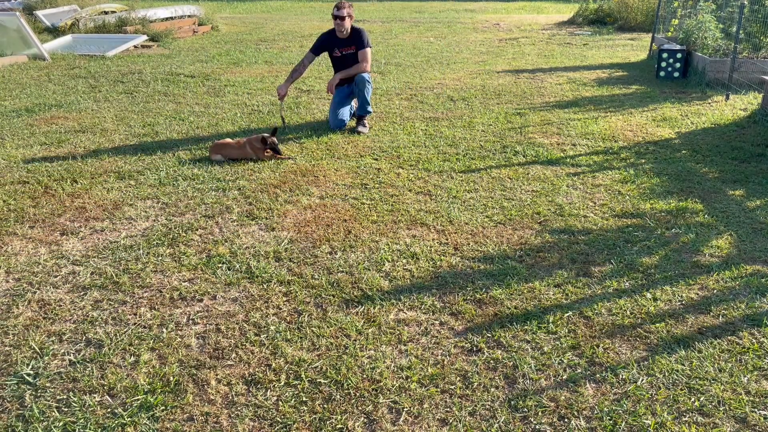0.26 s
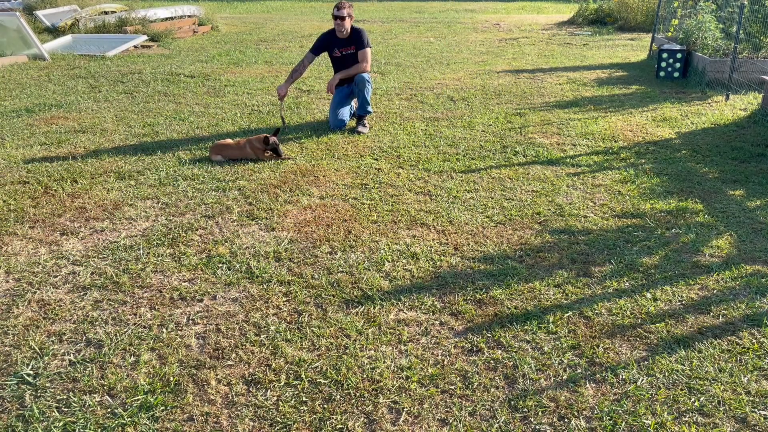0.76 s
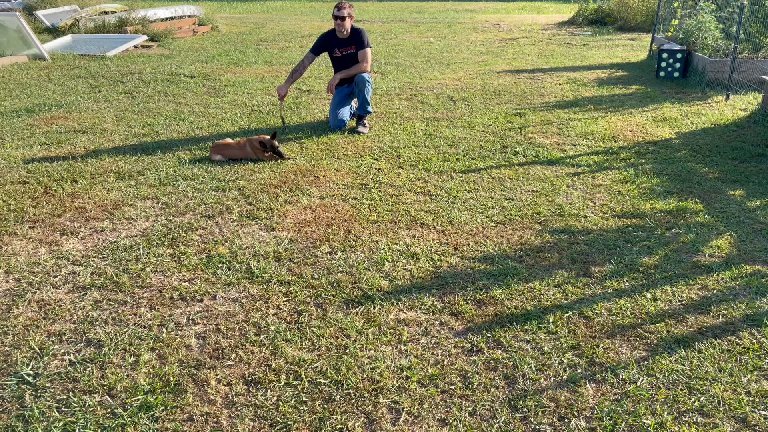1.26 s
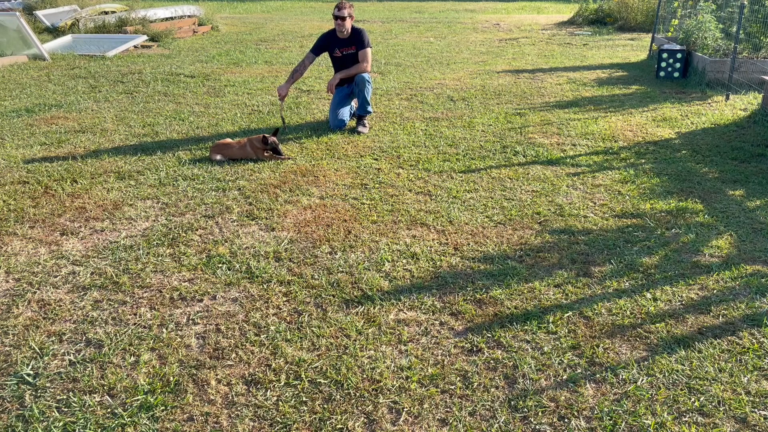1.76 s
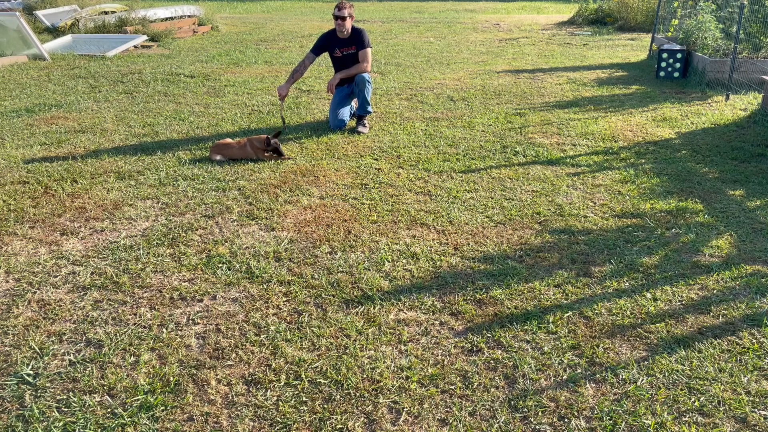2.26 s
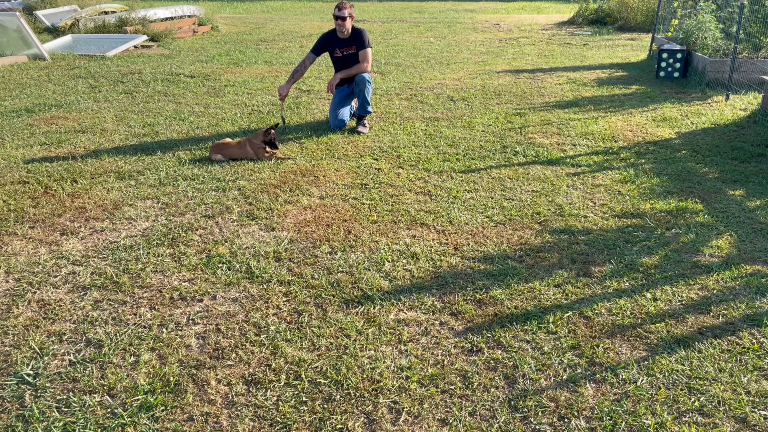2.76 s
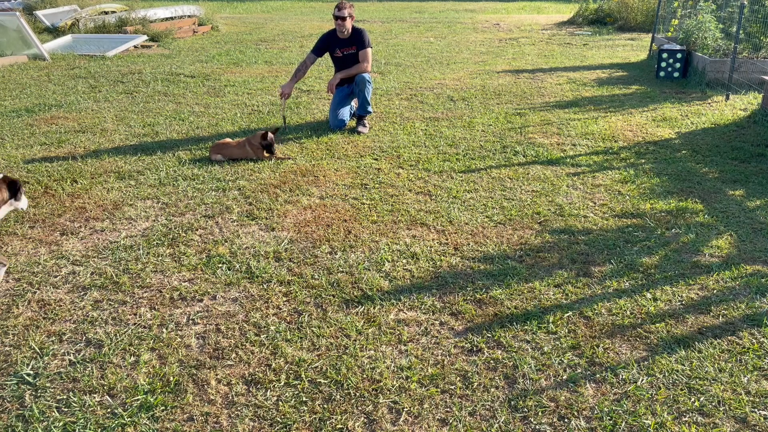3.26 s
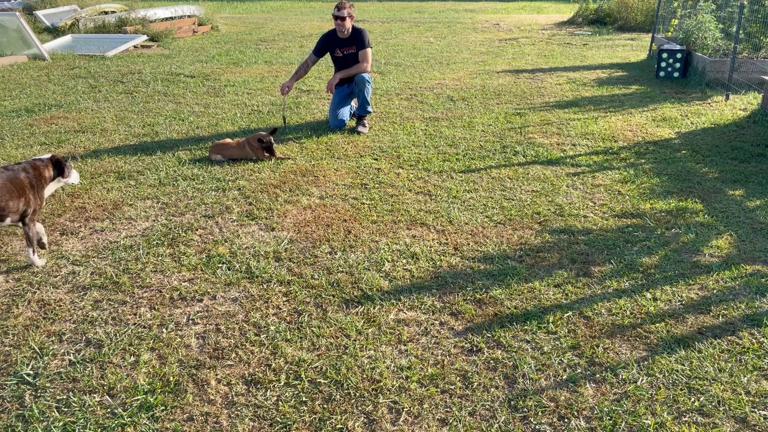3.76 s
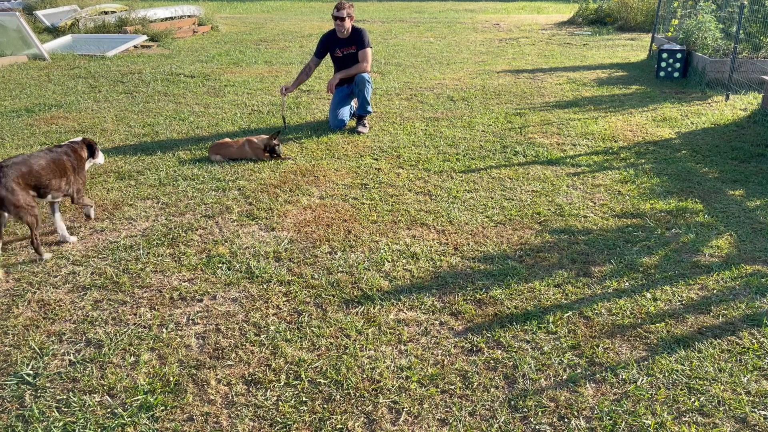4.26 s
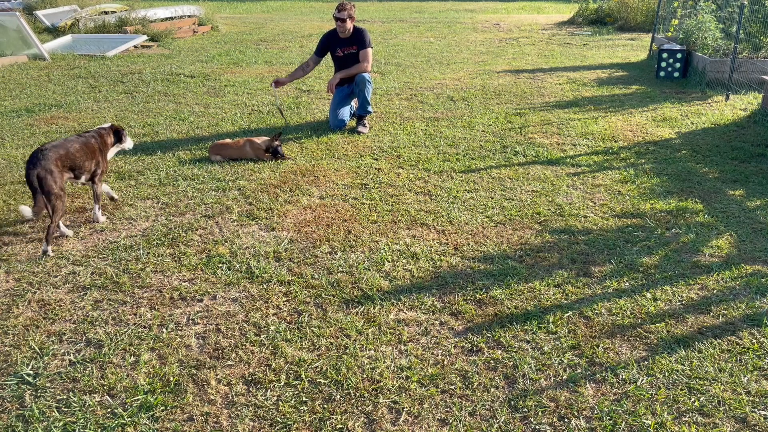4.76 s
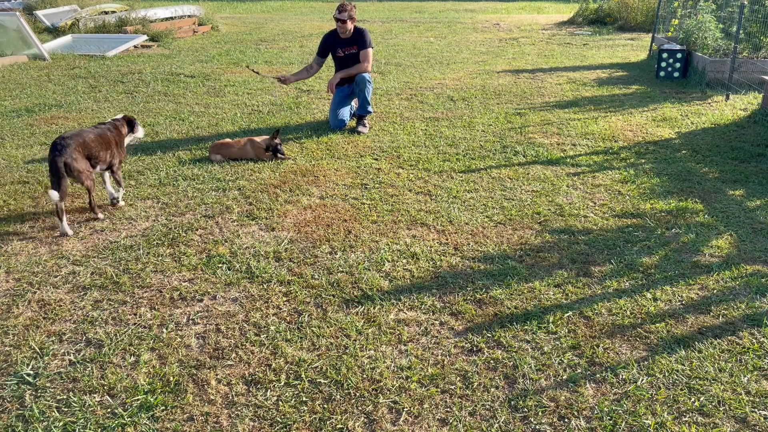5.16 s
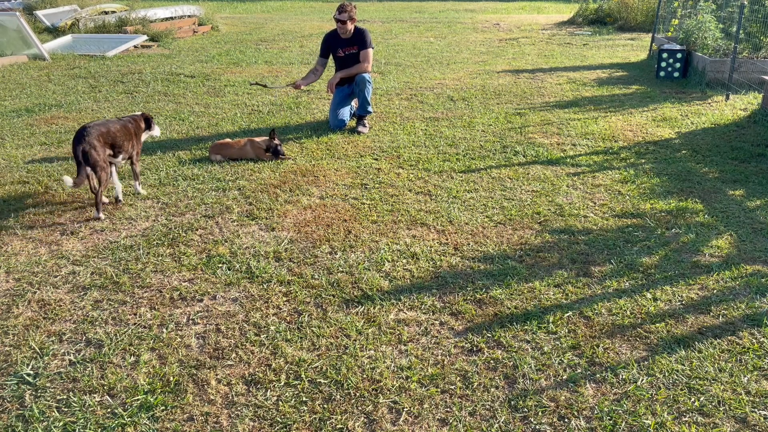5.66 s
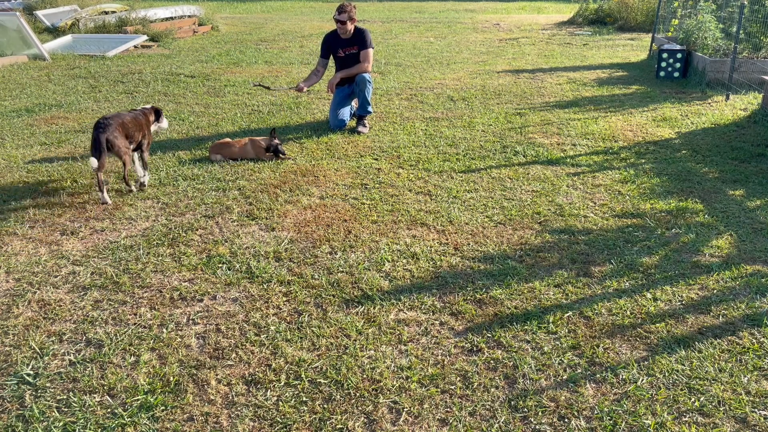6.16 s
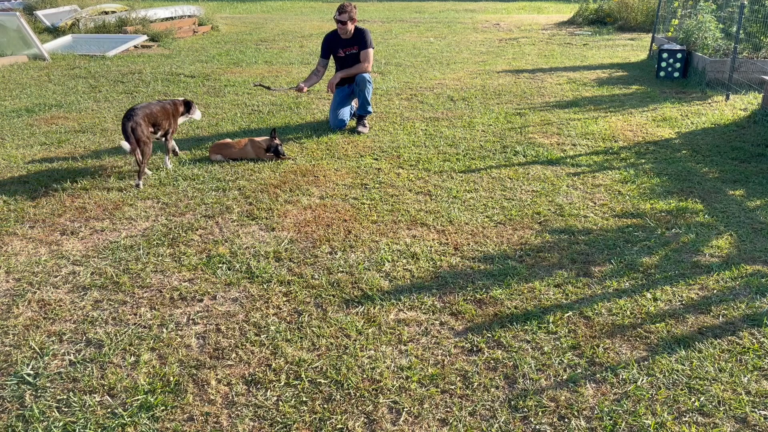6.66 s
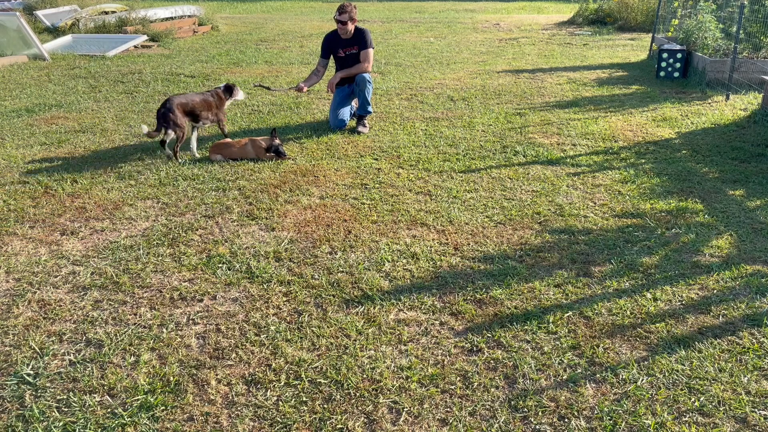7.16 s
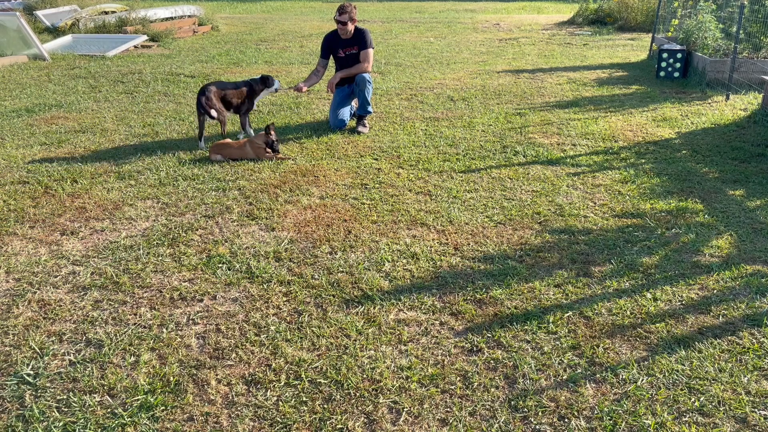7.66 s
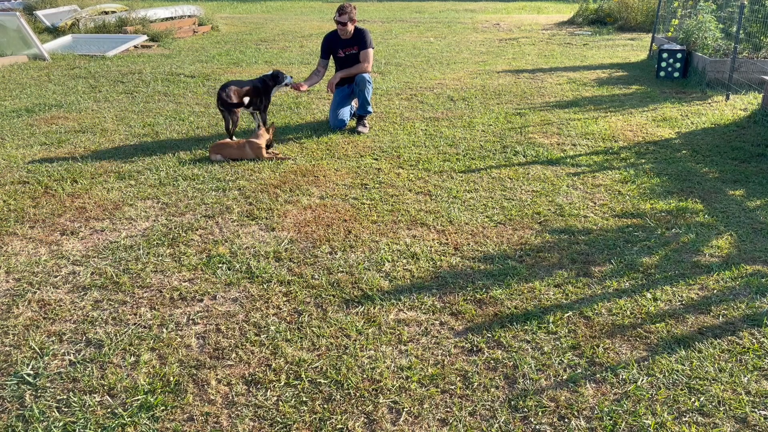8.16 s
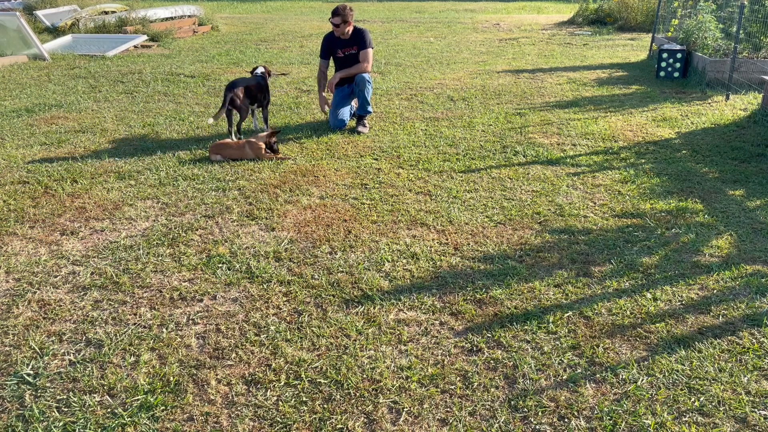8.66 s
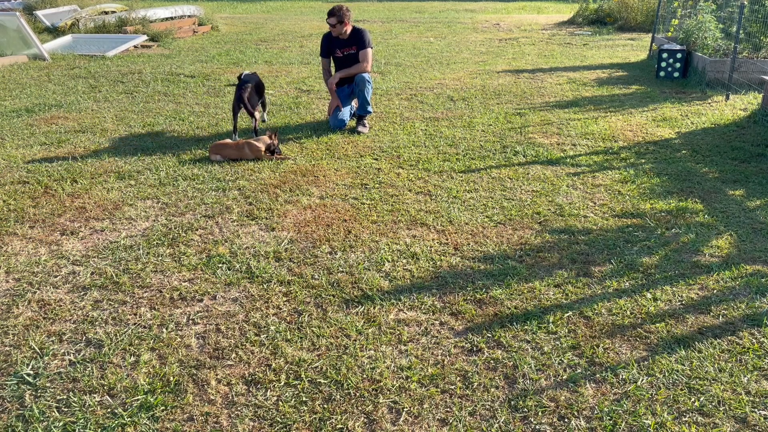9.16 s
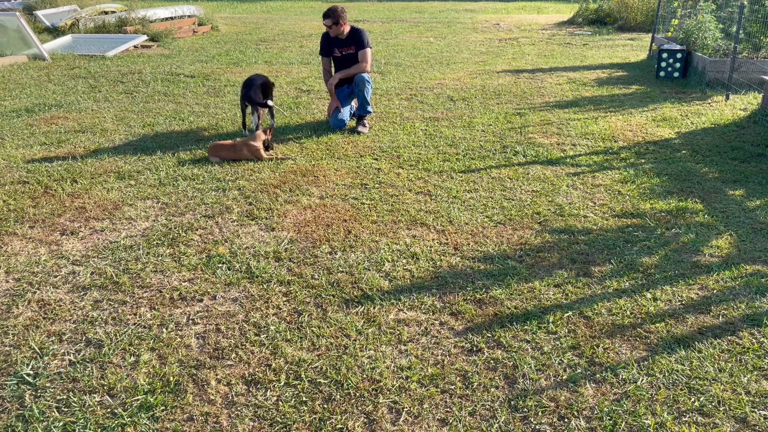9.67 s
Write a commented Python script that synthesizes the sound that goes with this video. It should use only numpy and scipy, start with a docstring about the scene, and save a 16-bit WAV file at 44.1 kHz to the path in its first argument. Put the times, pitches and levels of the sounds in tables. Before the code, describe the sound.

A quiet late-summer lawn in stereo, outdoors. Throughout, katydids make a dry, very high buzz pulsing about seventy times a second, a ground cricket trills finely, and field crickets give short falling chirps about twice a second, with far insects blurred behind and a soft wash of distant traffic and leaves. A bird whistles every second or so: a high chip, a held note, then a downward slur. Faint far yelps, each arching up and down, come between 2 and 4.3 s. Wind puffs begin near 1.2 s, growing into deep rumble and dull microphone thumps from 2 to 6 s. From 4.5 to 6.9 s the nearest katydid stops buzzing and ticks irregularly while another buzzes; then its buzz resumes. Two small, short knocks land at 6.8 and 7.2 s, the second softer. Wind is calm until about 8.5 s, then gusts rise again to the end, near 9.9 s.

```python
"""A lawn in late summer: three katydids buzz, one also ticks; a ground cricket trills, field crickets chirp.
Katydids are noise gated by wing strokes; crickets are short tones falling in pitch.
Meadow birds whistle gliding tones, far yelps arch in pitch, two small knocks ring short modes.
Gusts buffet two microphone ports as low noise and pressure pulses.
Behind: far katydids, far crickets, blurred choirs, and the low wash of traffic and leaves."""
import sys
import numpy as np
from scipy import signal
from scipy.fft import rfft, irfft, next_fast_len
from scipy.io import wavfile
from scipy.ndimage import uniform_filter1d

SR = 44100
rng = np.random.default_rng(int(sys.argv[2]) if len(sys.argv) > 2 else 0)


def materialize(psi):
    """Save the field psi as 16-bit PCM at rate SR to the path in sys.argv[1].

    A 1-D psi becomes a single channel; in a 2-D psi each row is a channel.
    """
    bounded = np.clip(np.atleast_2d(psi).T, -1, 1)
    quanta = np.round(bounded * 32767).astype(np.int16)
    wavfile.write(sys.argv[1], SR, quanta)


N = 437913
SIZE = next_fast_len(N + 4096)
HZ = np.maximum(np.arange(SIZE // 2 + 1) * SR / SIZE, 1)   # FFT bins, kept above 0 for the log


def from_db(db):
    """Decibels to gain."""
    return 10 ** (np.asarray(db) / 20)


def rms_one(x):
    """Scale to unit power."""
    return x / np.sqrt(np.mean(x ** 2) + 1e-20)


def in_time(rows, s):
    """Columns of a curve table, read at times s."""
    at, *columns = np.transpose(rows)
    return [np.interp(s, at, c) for c in columns]


def at_hz(points, hz):
    """A spectrum table read on a log-frequency axis."""
    point_hz, value = np.transpose(points)
    return np.interp(np.log(hz), np.log(point_hz), value)


def drift(rate_hz):
    """Random drift of unit rms: noise through two equal poles at rate_hz, run at SR / 40."""
    r = np.exp(-80 * np.pi * rate_hz / SR)
    noise = rng.standard_normal(N // 40 + 2002)
    slow = signal.lfilter([1], [1, -2 * r, r * r], noise)[2000:]   # settled part
    return np.interp(np.arange(N) / 40, np.arange(len(slow)), rms_one(slow))


def port_noise(gate, colour_db):
    """Two unrelated gated noises, coloured by colour_db(Hz); rms 1."""
    spectrum = rfft(gate * rng.standard_normal((2, N)), SIZE)
    return rms_one(irfft(spectrum * from_db(colour_db(HZ)), SIZE)[:, :N])


def add(out, s, hz, gain, left_db, lead_rad):
    """Add a tone at time s: left louder by left_db, right ahead in phase by lead_rad."""
    i = max(round(s * SR), 0)
    phase = 2 * np.pi * (np.cumsum(hz) / SR + rng.random())
    tone = gain * np.sin([phase, phase + lead_rad]) * from_db([[left_db / 2], [-left_db / 2]])
    out[:, i:i + len(hz)] += tone[:, :N - i]


# Katydid wing strokes: t/s, stroke rate/Hz, level/dB
KATYDID_A_STROKES = [(0, 79, -60), (1.3, 74, -60), (2.5, 74.1, -62), (3.5, 77, -57.5), (4.0, 72.3, -59.5),
                     (4.43, 70.8, -57), (4.46, 70.8, -95), (6.88, 76, -105), (6.93, 80, -62.5),
                     (7.5, 72, -62), (8.3, 74.8, -59), (8.8, 74.5, -61), (9.3, 70, -58), (9.93, 71, -63)]
KATYDID_B_STROKES = [(0, 64.6, -81), (1, 65.5, -81), (2, 68, -69), (3, 67, -66), (4, 66.6, -64.5),
                     (5, 65.6, -62.5), (6, 64.25, -61.5), (6.6, 65.5, -62.5), (7.5, 63.9, -63.5),
                     (8.3, 65.7, -68), (9.93, 64.3, -63)]
KATYDID_C_STROKES = [(4.3, 70, -93), (4.47, 69.6, -67), (5.0, 71.4, -63), (5.8, 70.4, -60),
                     (6.4, 69.9, -62), (6.88, 67.6, -62.5), (6.95, 68, -95)]
# Wing colours: f/Hz, relative density/dB
WING_A_COLOUR = [(5200, -24.5), (6200, -15), (7500, 0), (8400, -7), (9200, 5), (10000, 3), (11000, -1),
                 (12500, -5), (13500, -9.5), (14400, -5.5), (15500, -16), (17000, -21)]
WING_B_COLOUR = [(7000, -38), (9000, -5.5), (10300, -1), (11500, -6), (13000, -14.5), (14400, -18),
                 (17000, -24)]
WING_C_COLOUR = [(7000, -31), (9000, -6), (10500, -2), (12000, 0), (13000, -4), (14400, -4), (17000, -12)]


def katydids():
    """Three singers, each with its own stroke rate and wing resonance."""
    return (katydid(KATYDID_A_STROKES, WING_A_COLOUR, closing=0.66, swell=0.99, rest_db=-10)
            + katydid(KATYDID_B_STROKES, WING_B_COLOUR, closing=0.6, swell=1.1, rest_db=-13)
            + katydid(KATYDID_C_STROKES, WING_C_COLOUR, closing=0.61, swell=1.3, rest_db=-13))


def katydid(strokes, colour, closing, swell, rest_db):
    """The scrape swells over the closing share of each stroke cycle, then falls off fast to a floor."""
    rate_hz, level_db = in_time(strokes, np.arange(N) / SR)
    cycle = (np.cumsum(rate_hz) / SR + rng.random()) % 1
    rise = (cycle / closing) ** swell
    fall = np.exp((closing - cycle) / 0.072)
    gate = np.where(cycle < closing, rise, fall) + from_db(rest_db)
    gate = gate * from_db(1.1 * drift(36))
    return from_db(level_db) * port_noise(gate, lambda hz: at_hz(colour, hz))


# Wing flicks: t/s, peak level/dB
TICK_TIMES = [(4.915, -61), (5.083, -62), (5.168, -55), (5.263, -51), (5.428, -51), (5.518, -61),
              (5.637, -54), (5.771, -52), (5.887, -51), (6.001, -60), (6.114, -54), (6.241, -60),
              (6.368, -57), (6.531, -49), (6.659, -66), (6.781, -52)]


def ticks():
    """Single 7 ms flicks of the first katydid's wing."""
    gate, flick = np.zeros(N), np.hanning(round(0.007 * SR))
    for s, db in TICK_TIMES:
        gate[round(s * SR):][:len(flick)] = from_db(db) * flick
    gate_rms = np.sqrt(np.mean(gate ** 2))   # restores the level that port_noise evens out
    return gate_rms * port_noise(gate, lambda hz: at_hz(WING_A_COLOUR, hz))


def cricket(chirps, strokes, start_hz, fall_hz, left_db, lead_rad):
    """A chirp is wing strokes (delay/s, level/dB), each a pure tone falling in pitch."""
    out, u = np.zeros((2, N)), np.linspace(0, 1, round(0.0271 * SR))
    hump = np.sin(np.pi * u) ** 1.03
    for s, db in chirps:
        for delay_s, stroke_db in strokes:
            gain = from_db(db + stroke_db + rng.normal(0, 2.5)) * hump
            add(out, s + delay_s, start_hz - fall_hz * u, gain, left_db, lead_rad)
    return out


# Ground cricket, one row: pulse rate/Hz, start f/Hz, fall/Hz, level/dB before the stroke offset
TRILL_PULSES = (24, 6947, 254, -67.5)


def trill():
    """Ground cricket: evenly spaced pulses of uneven strength."""
    rate_hz, start_hz, fall_hz, db = TRILL_PULSES
    pulses = [(s, db + rng.normal(0, 0.8)) for s in np.arange(.018, N / SR, 1 / rate_hz)]
    return cricket(pulses, [(0, 0.11)], start_hz, fall_hz, left_db=0.58, lead_rad=1.45)


# Field cricket chirps: t/s, level/dB before the stroke offsets
RIGHT_CHIRPS = [(0.204, -57.5), (0.701, -58.5), (1.303, -59.5), (1.89, -60.5), (2.493, -56), (3.059, -59),
                (3.588, -58), (4.091, -61), (4.603, -60), (5.158, -60), (5.684, -59.5), (6.215, -57),
                (6.733, -61), (7.25, -62), (7.752, -62), (8.278, -63), (8.781, -62.5), (9.291, -64),
                (9.76, -63)]
AHEAD_CHIRPS = [(.05, -60.5), (.945, -63), (1.6, -63), (2.4, -63.5), (3.15, -64), (4.1, -61.5), (4.82, -72),
                (5.63, -68.5), (7.06, -76), (7.535, -71), (8.07, -77), (8.94, -69.5), (9.39, -69),
                (9.715, -67)]
HIGH_CHIRPS = [(.07, -61.5), (.52, -68), (.95, -67), (1.31, -69), (1.76, -70), (2.52, -61), (2.98, -66),
               (3.38, -68), (4.64, -68), (5.17, -64.5), (6.03, -65), (6.46, -63), (6.86, -62.5),
               (7.28, -69), (7.77, -65), (8.19, -64.5), (8.645, -64), (9.105, -69), (9.52, -71)]


def field_crickets():
    """Three chirpers, told apart by stroke pattern, pitch and direction."""
    right_strokes = [(0, .1), (.049, 1.5), (.1035, 2.5)]
    ahead_strokes = [(0, 1), (.052, 0.5), (.105, 2.5), (.162, 0.5)]
    high_strokes = [(0, -1), (.05, .1), (.102, .1)]
    return (cricket(RIGHT_CHIRPS, right_strokes, 4500, 425, left_db=-4, lead_rad=1.92)
            + cricket(AHEAD_CHIRPS, ahead_strokes, 4500, 444, left_db=1.7, lead_rad=.3)
            + cricket(HIGH_CHIRPS, high_strokes, 4780, 230, left_db=4.5, lead_rad=0.41))


# Phrase openings, a high chip dropping into a held note: t/s, chip f/Hz, chip level/dB, held start f/Hz,
# held end f/Hz, held length/s, held level/dB, right channel phase lead/(rad per kHz above 3.3 kHz)
BIRD_OPENINGS = [(.785, 4580, -65, 3970, 4075, .16, -72.5, 0.44),
                 (2.293, 4490, -65, 3740, 4010, 0.1, -71.5, 0.36),
                 (3.034, 4170, -87, 4000, 4030, 0.16, -72, 1.66),
                 (3.738, 4610, -52.5, 3970, 4160, 0.19, -66, 1.8),
                 (4.557, 4630, -59, 4020, 4170, 0.22, -70, 1.7),
                 (5.653, 4744, -62, 4050, 4230, 0.243, -70.5, 1.5),
                 (6.94, 4380, -82, 3860, 3950, 0.069, -77, .4),
                 (7.9, 4600, -57, 4070, 4220, .21, -65, 1.87)]
# Phrase closings, a slur that waits, then slides down: t/s, top f/Hz, wait/s, length/s, goal f/Hz,
# start level/dB, right channel phase lead/(rad per kHz above 3.3 kHz)
BIRD_SLURS = [(0.683, 3200, 0.055, .11, 2470, -75.5, 0.46), (1.02, 4080, .045, 0.16, 3470, -67.5, .4),
              (2.683, 4110, 0.092, 0.14, 3180, -66.5, 0.36), (3.225, 4290, 0.014, 0.11, 3260, -66.5, 1.8),
              (3.925, 4140, 0.024, .11, 3250, -66.5, .4), (4.003, 4400, 0.022, .2, 3330, -68.5, 1.2),
              (4.815, 4540, .03, .24, 3370, -66.5, 1.2), (5.951, 4380, 0.024, 0.12, 3270, -68, 1),
              (7.32, 4290, 0.039, 0.059, 2880, -64.5, .4), (7.394, 4200, 0.051, .135, 3180, -64, .4),
              (8.167, 4300, 0.027, 0.065, 3100, -62, 2.1)]
# Single peeps: t/s, length/s, start f/Hz, end f/Hz, level/dB
BIRD_PEEPS = [(0.871, 0.03, 2420, 2420, -73), (2.368, .035, 3060, 3100, -77),
              (2.923, 0.026, 2410, 2350, -75), (7.17, 0.0295, 4450, 4080, -69),
              (7.24, .04, 4420, 4150, -64)]
# Echoes off the ground and trees: delay/s, level/dB
BIRD_ECHOES = [(.011, -10), (0.026, -13.5)]
CHIP_S, DROP_S = 0.028, 0.0257
DROOP_HZ_PER_S, SLIDE_S = 1870, 0.053   # droop while waiting; time constant of the slide
SCOOP_HZ, SCOOP_S, FADE_DB_PER_S = 200, .012, 44   # upward scoop at the start
BIRD_LEFT_DB, BIRD_EDGE_S, WAVER_HZ = 3.3, 0.0077, 14.7


def birds():
    """Soft-ended, wavering whistles; moving air makes them flutter, ground and trees echo them."""
    out, waver_hz = np.zeros((2, N)), WAVER_HZ * drift(30)

    def whistle(s, hz, db, lead_per_khz):
        """Pure tone along a smoothed pitch curve."""
        t = np.arange(len(hz)) / SR
        ends = np.clip(np.minimum(t, t[-1] - t) / BIRD_EDGE_S, 0, 1)
        pitch_hz = uniform_filter1d(hz, size=300) + waver_hz[round(s * SR):][:len(hz)]
        gain = np.sqrt(2) * from_db(db) * ends   # level is rms
        add(out, s, pitch_hz, gain, BIRD_LEFT_DB, lead_per_khz * (hz - 3300) / 1000)

    for s, chip_hz, chip_db, held_hz, end_hz, held_s, held_db, lead in BIRD_OPENINGS:
        turns = np.cumsum([0, CHIP_S, DROP_S, held_s])
        t = np.arange(0, turns[-1], 1 / SR)
        hz = np.interp(t, turns, [chip_hz, chip_hz, held_hz, end_hz])
        whistle(s, hz, np.interp(t, turns, [chip_db, chip_db, held_db, held_db]), lead)
    for s, top_hz, wait_s, length_s, goal_hz, db, lead in BIRD_SLURS:
        t = np.arange(0, length_s, 1 / SR)
        drooping_hz = top_hz - DROOP_HZ_PER_S * np.minimum(t, wait_s)
        slide = np.exp(-np.maximum(t - wait_s, 0) / SLIDE_S)
        scoop_hz = SCOOP_HZ * np.exp(-t / SCOOP_S)
        hz = goal_hz + (drooping_hz - goal_hz) * slide - scoop_hz
        whistle(s, hz, db - FADE_DB_PER_S * t, lead)
    for s, length_s, start_hz, end_hz, db in BIRD_PEEPS:
        whistle(s, np.linspace(start_hz, end_hz, round(length_s * SR)), db, 0.32)
    echoes = sum(from_db(db) * np.roll(out, round(s * SR), axis=1) for s, db in BIRD_ECHOES)
    return (out + echoes) * from_db(3.5 * drift(40))


# Far yelps: t/s, length/s, top f/Hz, level/dB before a 1 dB trim
YELP_ARCHES = [(2.015, 0.11, 1460, -69), (2.387, .06, 1470, -75), (2.469, .1, 1430, -71),
               (2.745, .05, 1490, -76), (2.8, 0.089, 1470, -72), (2.994, .12, 1480, -71),
               (3.099, .11, 1470, -71.5), (3.375, 0.12, 1460, -72), (4.138, 0.12, 1460, -69.5)]


def yelps():
    """Pitch arches up and down; only the strongest partial carries this far."""
    out = np.zeros((2, N))
    for s, length_s, top_hz, db in YELP_ARCHES:
        u = np.linspace(-1, 1, round(length_s * SR))
        hz = top_hz * (1 - 0.26 * (u + 0.072) ** 2)
        add(out, s, hz, from_db(db - 1.0) * (1 - u ** 6), left_db=3.0, lead_rad=1.2)
    return out * from_db(3.6 * drift(90))   # a rough throat and moving air


# Knocks: t/s, strike level/dB
KNOCK_STRIKES = [(6.7833, -46.5), (7.2108, -51.5)]
# Modes struck: f/Hz, relative level/dB, t60/s
STRUCK_MODES = [(373, 1.5, 0.03), (730, -1, 0.0047), (1110, 3.5, 0.01), (2000, -7, 0.0034),
                (3800, -9, 0.0039)]
KNOCK_LAG_CYCLES = 1.1   # low modes speak later


def knocks():
    """Each knock and its quick rebound strike the same short modes."""
    clicks = np.zeros(N)
    for s, db in KNOCK_STRIKES:
        clicks[round(s * SR)] = from_db(db)
        clicks[round((s + .0035) * SR)] = -from_db(db - 11)
    out = np.zeros(N)
    for hz, db, t60_s in STRUCK_MODES:
        r, w = from_db(-60 / (t60_s * SR)), 2 * np.pi * hz / SR
        late = np.roll(clicks, round(KNOCK_LAG_CYCLES * SR / hz)) + 1e-18   # offset avoids denormals
        out += signal.lfilter([0, from_db(db) * np.sin(w)], [1, -2 * r * np.cos(w), r * r], late)
    soft = signal.sosfilt(signal.butter(2, 4200, fs=SR, output="sos"), out)   # soft contact: less treble
    return soft * from_db([[2.5], [-2.5]])


# Rising and falling wind under the puffs: t/s, rumble level/dB
BREEZE_LEVEL = [(0, -67.5), (1.0, -66), (1.5, -66), (2.1, -48), (2.42, -60), (2.7, -50), (3.3, -46),
                (3.9, -43), (4.3, -50), (4.5, -61), (5.0, -58), (5.3, -49), (5.6, -47), (5.9, -73),
                (6.4, -65.5), (7.2, -68), (7.6, -84), (8.4, -69), (8.9, -59.5), (9.35, -42.5), (9.6, -66),
                (9.75, -45), (9.93, -38.5)]
# Puffs: peak t/s, rumble level/dB, length/s, upper rumble re rumble/dB
WIND_PUFFS = [(0.047, -61, .06, -7), (1.085, -56, 0.055, -13), (1.223, -50, 0.13, -11),
              (1.3, -37.5, 0.065, -16), (1.453, -50, 0.12, -33), (1.66, -35.5, 0.085, -21),
              (1.823, -40.5, 0.043, -22), (1.974, -35.5, 0.068, -6.5), (2.16, -44, 0.2, -19),
              (2.32, -49, 0.055, -25), (2.497, -41.5, 0.029, -17), (2.636, -41.5, 0.17, -10),
              (2.748, -41, 0.089, -29), (2.883, -45.5, 0.086, -3), (3.022, -40.5, 0.054, -13),
              (3.148, -45, 0.041, -10), (3.215, -33.5, 0.046, -11), (3.323, -38.5, 0.087, -22),
              (3.44, -31.5, 0.067, -14), (3.67, -39.5, 0.098, -24), (3.752, -28.5, 0.099, -10.5),
              (3.863, -43, 0.046, -6), (3.955, -33, 0.095, -10.5), (4.14, -37, 0.056, -7),
              (4.27, -47, 0.046, -24), (4.365, -41, 0.034, -28), (4.647, -33.5, 0.041, -7.5),
              (4.931, -40.5, 0.07, -37), (5.096, -45, .06, -8.5), (5.17, -35, 0.072, -10.5),
              (5.26, -44, .1, -18), (5.48, -33, .11, -6), (5.665, -35, 0.037, -9), (5.812, -53, .08, -8.5),
              (6.119, -43.5, .1, -15), (6.26, -50, 0.18, -4.5), (6.864, -50.5, 0.042, -23),
              (7.02, -58, .06, -18), (7.208, -53.5, 0.048, -26), (7.377, -64, .08, -8),
              (8.18, -62, 0.13, 2), (8.498, -50, 0.08, -9), (8.633, -41.5, 0.079, -19),
              (8.715, -41, 0.047, -9.5), (8.976, -56, 0.071, -14), (9.076, -43.5, 0.069, -27),
              (9.241, -35, 0.055, -10), (9.375, -41.5, 0.09, -5), (9.467, -41.5, .1, -12),
              (9.679, -44.5, 0.046, -10), (9.767, -32.5, .06, -9.5), (9.86, -39, .07, -28)]
BREEZE_UPPER_DB = -11   # upper rumble re rumble
PUFF_RISE, PUFF_EDGE_DB = 0.47, 11   # share of the length before the peak; fall at either end


def gusts():
    """Gains of rumble and upper rumble: breeze and puffs, summed in power."""
    s = np.arange(N) / SR
    breeze_db, = in_time(BREEZE_LEVEL, s)
    power = from_db(2 * breeze_db) * from_db([[0], [2 * BREEZE_UPPER_DB]])
    for at, db, length_s, upper_db in WIND_PUFFS:
        start, stop = at - 2 * length_s, at + 2 * length_s
        near = slice(max(round(start * SR), 0), round(stop * SR))
        u = (s[near] - at) / length_s
        off = np.where(u < 0, -u / PUFF_RISE, u / (1 - PUFF_RISE))
        puff_db = db - PUFF_EDGE_DB * off ** 1.63
        power[:, near] += from_db(2 * puff_db) * from_db([[0], [2 * upper_db]])
    return np.sqrt(power)


def evened(x, span_s):
    """Noise with its swells longer than span_s levelled out."""
    local_power = uniform_filter1d(x ** 2, round(span_s * SR))
    return rms_one(x / np.sqrt(local_power + 0.046))


# Wind colours: f/Hz, relative density/dB
RUMBLE_COLOUR = [(15, -33), (30, -13.5), (45, 3.5), (70, 4.5), (95, -8), (130, -30), (200, -71)]
UPPER_RUMBLE_COLOUR = [(60, -35.5), (95, 8.5), (125, 0.5), (170, -8.5), (240, -20.5), (330, -33.5),
                       (500, -74)]
# Eddies bursting on the ports: t/s, level/dB (peak before a 1 dB lift and random side gains)
EDDY_THUMPS = [(1.668, -36.5), (1.959, -27), (2.582, -31.5), (2.879, -37.5), (3.167, -37.5), (3.388, -34),
               (3.55, -44), (3.741, -33), (3.847, -38.5), (3.914, -37.5), (4.123, -34), (4.63, -34.5),
               (5.144, -36.5), (5.398, -31.5), (5.443, -29), (5.645, -32.5), (6.202, -43), (8.627, -47.5),
               (9.654, -46), (9.744, -35.5), (9.83, -41.5)]
THUMP_HZ = 130.6   # low-pass corner: sharpness of the pulse


def wind():
    """Lumpy low noise under the gusts; each burst eddy is a pressure pulse through a bass cut."""
    rumble_gain, upper_gain = gusts()
    rumble = evened(port_noise(1, lambda hz: at_hz(RUMBLE_COLOUR, hz)), span_s=0.056)
    upper = evened(port_noise(1, lambda hz: at_hz(UPPER_RUMBLE_COLOUR, hz)), span_s=0.043)
    low = rumble_gain * from_db(1.6 * drift(18)) * rumble
    low = low + upper_gain * from_db(2.95 * drift(25)) * upper
    out = signal.sosfilt(signal.butter(4, 500, fs=SR, output="sos"), ports(low))

    click = np.eye(1, SR // 3)[0]
    rounded = signal.sosfilt(signal.butter(4, THUMP_HZ, fs=SR, output="sos"), click)
    thump = signal.sosfilt(signal.butter(6, 62, "high", fs=SR, output="sos"), rounded)
    thump = thump / np.abs(thump).max()
    for s, db in EDDY_THUMPS:
        sign, side = rng.normal(0, 1, 2)
        pulse = np.sign(sign) * from_db(db + 1.0) * thump
        i = round(s * SR)
        out[:, i:i + len(pulse)] += pulse[:N - i] * from_db([[1.2 * side], [-.7 * side]])
    return out


# Far katydids' colour: f/Hz, relative density/dB
FAR_WING_COLOUR = [(5200, -17), (6300, -7.5), (7800, -3.5), (9200, -2), (10200, -9.5), (11500, -2.5),
                   (13000, -5), (14400, -10), (15600, -6.5), (17000, -6)]
FAR_KATYDIDS_DB = -63


def far_katydids():
    """Many wings blur into drifting treble noise."""
    noise = port_noise(from_db(2.1 * drift(10)), lambda hz: at_hz(FAR_WING_COLOUR, hz))
    return from_db(FAR_KATYDIDS_DB) * noise


def far_crickets(count):
    """Each has its own pitch, pace, place and level."""
    out = 0
    for pitch, pace, level, side in rng.random((count, 4)):
        starts = np.arange(pace * .5, N / SR - .25, .45 + 0.34 * pace)
        chirps = [(s + rng.normal(0, 0.037), -68.5 - 5.4 * level) for s in starts]
        strokes = [(0, -1.3), (.05, .1), (.102, .1)]
        left_db, lead_rad = 1 + 6 * (side - .5), 1.8 * (side - .5)
        out = out + cricket(chirps, strokes, 4500 + 330 * pitch, 340, left_db, lead_rad)
    return out


def peak(centre_hz, width_hz):
    """A resonance passed twice, as dB over frequency."""
    return lambda hz: -20 * np.log10(1 + (2 * (hz - centre_hz) / width_hz) ** 2)


# Blurred choirs of far crickets: f/Hz, width/Hz, level/dB, flicker/dB
CRICKET_CHOIRS = [(4383, 590, -74, 0.5), (6140, 82, -79.5, 2.5), (6900, 1270, -71.5, 0.5),
                  (10010, 250, -70, 2)]


def choirs():
    """Far chirps blurred into flickering noise bands."""
    out = 0
    for hz, width_hz, db, flicker_db in CRICKET_CHOIRS:
        out = out + from_db(db + flicker_db * drift(17)) * port_noise(1, peak(hz, width_hz))
    return out


# Far traffic and leaves: f/Hz, relative density/dB
AIR_COLOUR = [(15, -29), (25, -9), (81, 2), (164, -5), (338, -5), (556, -11), (836, -13.5), (1120, -19.5),
              (2540, -23.5), (2970, -34), (3250, -24), (3730, -25), (4370, -15.5), (5000, -28), (5600, -29),
              (7280, -50), (12300, -120)]
AIR_DB = -63.5


def air():
    """Far traffic and leaves: slowly drifting coloured noise."""
    return from_db(AIR_DB + 1.0 * drift(1.65)) * port_noise(1, lambda hz: at_hz(AIR_COLOUR, hz))


# Stereo phase of the spread-out sound: f/Hz, right channel ahead of left/half turns
STEREO_PHASE = [(20, 0), (5500, 0), (6050, .1), (7050, .5), (7650, 1), (8650, 1), (9650, 1.47),
                (10200, 1.63), (10950, 2), (12450, 2), (13250, 2.55), (13950, 3), (17000, 3)]
# Likeness of the channels: f/Hz, share of sound common to both
STEREO_LIKENESS = [(20, 0.95), (150, 0.78), (350, 0.8), (700, 0.24), (1300, 0.053), (2400, 0.57),
                   (3300, 0.8), (4300, 0.39), (5200, 0.55), (6100, 0.74), (7000, 1), (7700, 1), (8600, 1),
                   (9300, 0.98), (10300, 1), (11000, 0.98), (12400, 1), (13200, 0.82), (14000, 1)]


def ports(pair):
    """Spread-out sound in stereo: one noise is common to both channels, the other opposed."""
    alike = np.clip(at_hz(STEREO_LIKENESS, HZ), 0, 1)
    common, apart = rfft(pair, SIZE) * np.sqrt([1 + alike, 1 - alike]) / np.sqrt(2)
    phase_turn = np.exp(1j * np.pi * at_hz(STEREO_PHASE, HZ))
    return irfft([common + apart, (common - apart) * phase_turn], SIZE)[:, :N]


def scene():
    """Spread-out sources share one stereo spread; the others bring their own direction."""
    spread = katydids() + ticks() + far_katydids() + choirs() + air()
    insects = trill() + field_crickets() + far_crickets(count=7)
    return ports(spread) + insects + birds() + yelps() + knocks() + wind()


def record(dry):
    """Steep low-pass at 15.75 kHz."""
    return signal.sosfilt(signal.ellip(12, .5, 70, 15750, fs=SR, output="sos"), dry)


dry = scene()
out = record(dry)
materialize(out)
```